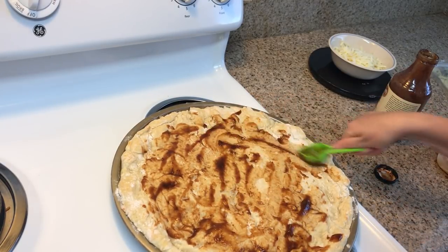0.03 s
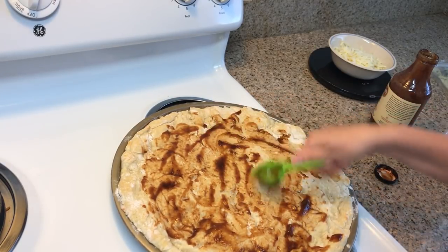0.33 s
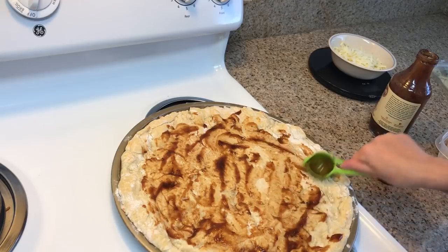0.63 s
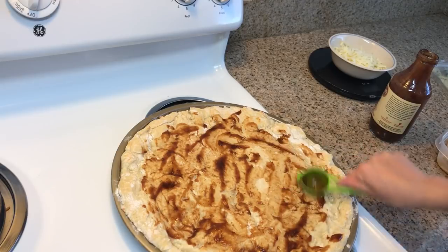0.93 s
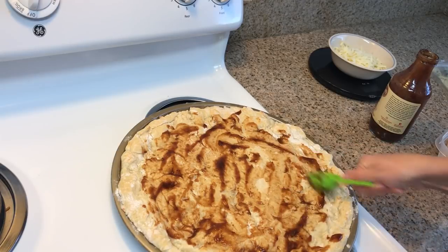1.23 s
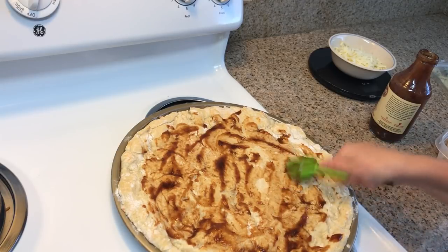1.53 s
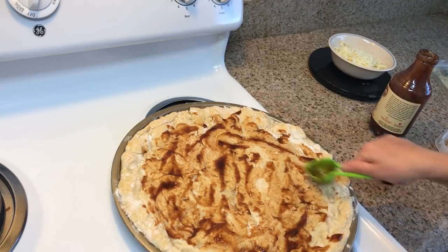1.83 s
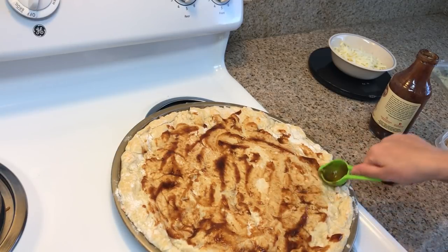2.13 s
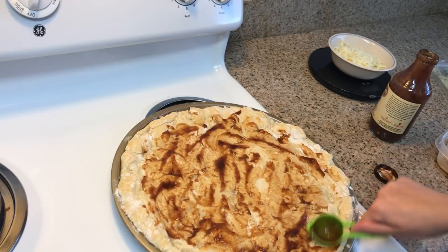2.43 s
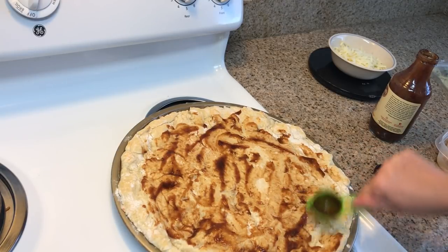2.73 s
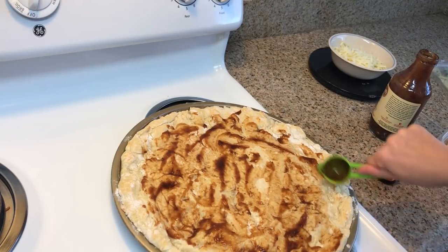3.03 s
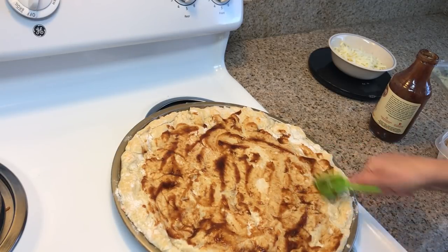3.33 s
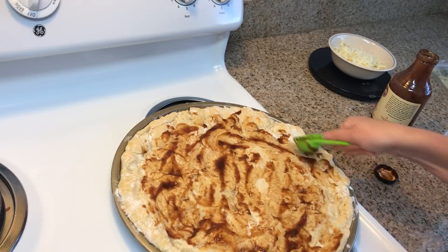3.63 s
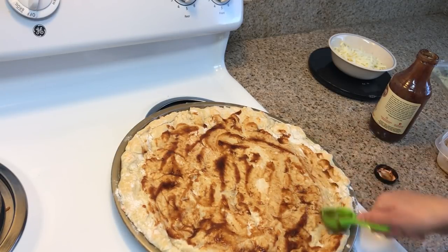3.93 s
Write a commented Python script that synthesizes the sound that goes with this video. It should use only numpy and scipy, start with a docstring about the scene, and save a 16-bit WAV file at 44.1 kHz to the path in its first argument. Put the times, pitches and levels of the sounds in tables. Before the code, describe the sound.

Thick sauce is spread over dough with a plastic scoop in short, wet scraping strokes.

```python
"""Spreading sauce on dough

A plastic scoop spreads thick sauce over dough in a metal pan, in short irregular strokes.
Each stroke is a dense fizz of tiny wet slips, coloured by the hollow under the scoop; pressing adds
a dull rub. The scoop sometimes squeaks, and ticks as it lands and the sauce sticks and lets go.
A small kitchen rings briefly and an appliance hums underneath."""
import sys
import numpy as np
from scipy import signal
from scipy.fft import rfft, irfft
from scipy.io import wavfile

SR = 44100
rng = np.random.default_rng(int(sys.argv[2]) if len(sys.argv) > 2 else 0)


def unload_wav(signal):
    """Save mono or channel-first audio to the path in sys.argv[1] as 16-bit WAV at rate SR, clipped to [-1, 1]."""
    wavfile.write(
        sys.argv[1],
        SR,
        np.round(np.clip(np.atleast_2d(signal).T, -1, 1) * 32767).astype(np.int16),
    )


N = 176400


def amp(db):
    """Decibels to gain."""
    return 10 ** (np.asarray(db) / 20)


def unit(x):
    """Scales to rms 1."""
    return x / np.sqrt(np.mean(x ** 2) + 1e-20)


def curve_at(points, hz):
    """Reads a curve on a log-frequency axis."""
    f, value = np.transpose(points)
    return np.interp(np.log(hz + 1), np.log(f + 1), value)


def add(mix, start_s, sound):
    """Mixes a sound in at its cue, trimming any overhang."""
    at = round(start_s * SR)
    sound = sound[max(-at, 0):]
    part = mix[max(at, 0):][:len(sound)]
    part += sound[:len(part)]


def colour(x, eq, tilt_db=0):
    """Applies an EQ curve and a tilt per octave above 1 kHz, at rms 1."""
    hz = np.fft.rfftfreq(len(x), 1 / SR)
    octaves = np.log2(np.maximum(hz, 1000) / 1000)
    return unit(irfft(rfft(x) * amp(curve_at(eq, hz) + tilt_db * octaves), len(x)))


def resonate(x, hz, width_hz):
    """Passes x through a steep resonance, at rms 1."""
    f = np.fft.rfftfreq(len(x), 1 / SR)
    return unit(irfft(rfft(x) / (1 + 2j * (f - hz) / width_hz) ** 2, len(x)))


def wander(seconds, size):
    """Smooth random modulation on the given time scale, at rms 1."""
    f = np.fft.rfftfreq(size, 1 / SR)
    return unit(irfft(rfft(rng.standard_normal(size)) * np.exp(-(2 * f * seconds) ** 2), size))


def slips(size, per_s=16000, spread_db=3.0):
    """Tiny wet slips: a dense train of clicks of uneven strength."""
    strength = amp(spread_db * np.minimum(rng.exponential(1, size), 4))
    polarity = np.sign(rng.standard_normal(size))
    return strength * polarity * (rng.random(size) < per_s / SR)


# EQ of the bright, wet fizz as heard, with two narrow microphone dips at 4.9 and 10.4 kHz:
# f/Hz, gain/dB
FIZZ_EQ = [(300, -56), (1200, -20), (1900, -12.5), (2400, -6), (4000, 0), (4650, 0), (4900, -3), (5900, 1),
           (8000, 0), (9900, 1), (10430, -7), (10900, -.5), (13000, -2), (13900, -5.5), (16000, -7.5)]
# EQ of the dull rub of pressing: f/Hz, gain/dB
RUB_EQ = [(100, -16), (300, -11), (550, -6), (800, -4.5), (1300, -4.5), (2000, -5.5), (4000, -31),
          (16000, -35)]
# Scoop strokes, with hollow and rub levels relative to the fizz:
# t/s, touch-down/s, rise/s, fall/s, level/dB, tilt/(dB/octave), hollow f/Hz, hollow/dB, rub/dB
STROKE_CUES = [ (-.02, 0.0045, .03, 0.1, -50.5, -3.5, 4500, -12, -6),
               (.031, .003, .009, .007, -46.5, -7, 2360, 4, -23),
               (.062, 0.0087, 0.044, 0.044, -29, -0.5, 3700, -12.5, -28),
               (0.141, .01, 0.029, 0.026, -44, 0.5, 4000, -6, -7.5),
               (.525, .004, .012, .018, -62.5, -3, 4200, -4, -10),
               (.60, .003, 0.042, 0.028, -55, 4, 4040, -3, -3),
               (.659, 0.012, 0.023, 0.018, -30.5, 3, 7600, -2.5, -25),
               (.678, .010, .027, 0.028, -28, 0.5, 8850, -7, -26),
               (.69, .008, 0.017, 0.027, -43, -5, 2100, -3, -12),
               (.95, .01, 0.078, .02, -60, 1, 7000, -11, -7),
               (1.022, 0.015, 0.047, 0.042, -30.5, 0, 3930, -11, -22),
               (1.209, .01, 0.043, .03, -55, 3, 3900, -5, -3),
               (1.276, 0.0036, 0.01, .04, -35, 6.5, 3080, -8, -19),
               (1.285, .01, 0.053, 0.029, -31.5, .5, 3700, -3.5, -27),
               (1.335, .01, 0.034, .042, -35.5, -2, 4500, 0, -15),
               (1.685, 0.032, 0.034, 0.016, -43.5, 2.5, 7140, -8, -7),
               (1.729, .005, 0.0099, 0.027, -50, -5, 8600, -1.5, -8),
               (1.783, 0.0064, 0.03, 0.037, -42.5, -2.5, 3880, -7, -10.5),
               (2.055, .005, 0.077, .02, -51.5, -4.5, 7100, -18, -13),
               (2.122, 0.018, 0.044, 0.025, -36, -2, 4070, -6, -23),
               (2.175, .01, 0.037, 0.021, -45, -.5, 4200, -11, -7.5),
               (2.466, 0.0064, 0.032, .04, -42, -6, 4500, -7, -2),
               (2.53, 0.01, 0.034, .058, -35.5, -2, 7400, -8, -13),
               (2.59, .01, 0.017, 0.032, -35.5, 6, 4560, -5.5, -27),
               (2.625, .01, 0.025, 0.048, -39, -3, 3170, -11, -17),
               (2.876, .003, .012, 0.025, -59, -9, 2600, 0, 2),
               (2.918, 0.0059, 0.021, 0.039, -43, -8, 2350, 0, -3),
               (2.945, 0.027, 0.058, 0.046, -30, -1.5, 2730, -12.5, -21),
               (3.02, .01, 0.024, 0.058, -40.5, -5.5, 2640, -9.5, -15),
               (3.305, .004, 0.013, .05, -57.5, -5.5, 7500, -15, -6),
               (3.394, 0.0022, .012, .025, -41.5, 0, 3470, -2, -18),
               (3.413, .008, 0.032, 0.019, -28.5, 0.5, 4600, 0, -30),
               (3.460, 0.0048, 0.024, 0.027, -27.5, -1.5, 7600, -13, -23),
               (3.485, 0.011, 0.018, 0.029, -45, -2, 4000, -3, -3),
               (3.820, 0.0027, 0.008, 0.04, -47.5, -2, 6060, -2.5, -5),
               (3.88, .003, 0.0096, 0.028, -50.5, -4, 3500, -8, -19),
               (3.914, 0.0028, 0.0056, 0.018, -40.5, -1.5, 4200, -10, -25),
               (3.928, .005, .022, 0.021, -29, -1.5, 4800, 1.5, -40),
               (3.96, 0.0076, 0.028, .03, -28, -1.5, 5260, -5, -24)]
def stroke(touch, rise, fall, level_db, tilt_db, hollow_hz, hollow_db, rub_db):
    """Wet slips swell and fade with the scoop's speed while sticky sauce snaps under it."""
    edge_db, lift_s = -12, 0.012
    snaps_per_s, snap_db = 170, -13.5
    size = 2 ** 13
    t = np.arange(size) / SR
    fizz = colour(slips(size), FIZZ_EQ, tilt_db)
    hollow = amp(hollow_db) * resonate(slips(size), hollow_hz, width_hz=1830)
    clicks = rng.standard_normal(size) * (rng.random(size) < snaps_per_s / SR)
    snaps = amp(snap_db) * colour(clicks, FIZZ_EQ, tilt_db)
    rub = amp(rub_db) * colour(slips(size), RUB_EQ)
    # The level is an arch, edge_db down at each end, softened by touch-down and lift-off.
    off_peak = np.maximum(1 - t / rise, 0) ** 1.18 + np.maximum((t - rise) / fall, 0) ** 1.51
    contact = np.minimum(t / touch, 1) * np.exp(-np.maximum(t - rise - fall, 0) / lift_s)
    judder_db = 0.44 * wander(0.0017, size)
    envelope = contact * amp(level_db + edge_db * off_peak + judder_db)
    return envelope * (fizz + hollow + snaps + rub)


def early_reflections(x, count=5, each_db=-16, longest_s=0.004):
    """Hob, pan and bottle reflect the sound, differently at each place of the scoop."""
    hz = np.fft.rfftfreq(len(x), 1 / SR)
    delays = longest_s * rng.uniform(0.203, 1, (count, 1))
    comb = 1 + amp(each_db) * np.exp(-2j * np.pi * hz * delays).sum(0)
    return irfft(rfft(x) * comb, len(x)) / np.sqrt(1 + count * amp(each_db) ** 2)


# Reverb time of the small kitchen: f/Hz, T60/s
KITCHEN_DECAY = [(400, 0.48), (1300, 0.45), (3500, 0.29), (9000, 0.28), (15000, 0.17)]
def kitchen_reverb(x, wet_db=-8, predelay_s=0.003, density=0.2):
    """Dense reflections from hob, counter and walls, the treble dying first."""
    taps = rng.standard_normal(SR // 2) * (rng.random(SR // 2) < density)
    taps[:round(predelay_s * SR)] = 0
    hz, t, bands = signal.stft(taps, SR, nperseg=256)
    decay = amp(-60 * t / curve_at(KITCHEN_DECAY, hz)[:, None])
    tail = signal.istft(bands * decay, SR, nperseg=256)[1]
    return amp(wet_db) * signal.fftconvolve(x, tail / np.linalg.norm(tail))[:N]


# Partials of the motor hum: f/Hz, rms level/dB
HUM_PARTIALS = [(57.94, -49), (115.9, -63), (96.4, -57.5), (146.1, -65.5), (173.1, -51.5), (288.5, -58),
                (347.6, -62.5), (689.6, -66), (742.4, -69), (864, -70)]
def appliance(waver=0.081, drift_rad=0.32, waver_s=0.23, rumble_db=-60):
    """A motor hums over a low rumble, each partial wavering in level and phase."""
    t = np.arange(N) / SR
    hum = np.zeros(N)
    for hz, db in HUM_PARTIALS:
        gain = amp(db) * np.sqrt(2) * (1 + waver * wander(waver_s, N))
        phase = 2 * np.pi * (hz * t + rng.random()) + drift_rad * wander(waver_s, N)
        hum += gain * np.sin(phase)
    return hum + amp(rumble_db) * resonate(rng.standard_normal(N), hz=46.4, width_hz=22.5)


# Narrow bands of hiss in the room air: f/Hz, width/Hz, rms level/dB
WHINE_BANDS = [(2468, 120, -75.5), (2690, 230, -70), (3090, 200, -76), (13900, 800, -78)]
# EQ of the wash of air: f/Hz, gain/dB
AIR_EQ = [(12, -58), (20, -29), (44, 3.5), (70, -5.5), (118, -8.5), (138, -13), (177, -9.5), (204, -14),
          (285, -13), (350, -15), (450, -20.5), (950, -22), (1250, -25), (1600, -26), (2150, -32.5),
          (3400, -35.5), (4400, -35), (5000, -38.5), (7000, -40), (9800, -46), (10400, -45.5), (11300, -45),
          (16000, -46)]
def room_air(wash_db=-47):
    """A dark bed of room air with a thin whine on top."""
    whine = sum(amp(db) * resonate(rng.standard_normal(N), hz, width) for hz, width, db in WHINE_BANDS)
    return whine + amp(wash_db) * colour(rng.standard_normal(N), AIR_EQ)


# Scoop squeaks, two faint and drawn out, two sharp chirps:
# peak t/s, swell/s, fade/s, level/dB, f/Hz, pitch scatter/fraction, rasp/dB relative to the tone
SQUEAK_CUES = [(.42, .14, .12, -68, 4560, 0.052, -19), (1.985, 0.027, 0.045, -61.5, 4550, 0.027, -18),
               (2.4998, .0038, .0024, -29, 4550, .07, 3), (2.5440, .0025, .0038, -30, 5600, 0.19, -2)]
def squeak(peak_s, swell, fade, level_db, hz, scatter, rasp_db):
    """The slips lock to an unsteady pitch for a moment, with a rasp on top."""
    t = np.arange(N) / SR - peak_s
    envelope = amp(level_db) * np.exp(-np.abs(t) / np.where(t < 0, swell, fade))
    pitch_hz = hz * (1 + scatter * wander(0.0005, N))
    tone = unit(np.sin(2 * np.pi * np.cumsum(pitch_hz) / SR))
    rasp = amp(rasp_db) * resonate(slips(N), hz=7400, width_hz=6000)
    return envelope * (tone + rasp)


# Sticky ticks: t/s, level/dB, tilt/(dB/octave)
TICK_CUES = [(.602, -51, 6), (.621, -50, 2), (.640, -42, 12), (1.217, -46, -3), (1.678, -47, 12),
             (2.451, -42, -6), (2.468, -47, 0), (3.441, -39, -1), (3.806, -46, -5.5), (3.948, -32, -2)]
def tick(level_db, tilt_db, decay_s=0.0057):
    """Sauce sticks and lets go in a sudden, quickly dying cluster of slips."""
    t = np.arange(2 ** 11) / SR
    return amp(level_db) * np.exp(-t / decay_s) * colour(slips(len(t)), FIZZ_EQ, tilt_db)


def scene():
    """The scoop at work in the humming kitchen; each stroke has its own reflections."""
    accents = sum(squeak(*cue) for cue in SQUEAK_CUES)
    for start_s, *cue in TICK_CUES:
        add(accents, start_s, tick(*cue))
    mix = accents + kitchen_reverb(accents) + appliance() + room_air()
    for start_s, *cue in STROKE_CUES:
        smear = early_reflections(stroke(*cue))
        add(mix, start_s, smear)
        add(mix, start_s, kitchen_reverb(smear))
    return mix[None]


def record(dry):
    """A steep low-pass takes the very top off the mix."""
    cutoff_hz = 15850
    lowpass = signal.firwin(611, cutoff_hz, window=("kaiser", 8), fs=SR)
    return signal.oaconvolve(dry, lowpass[None], "same")


dry = scene()
out = record(dry)
unload_wav(out)
```